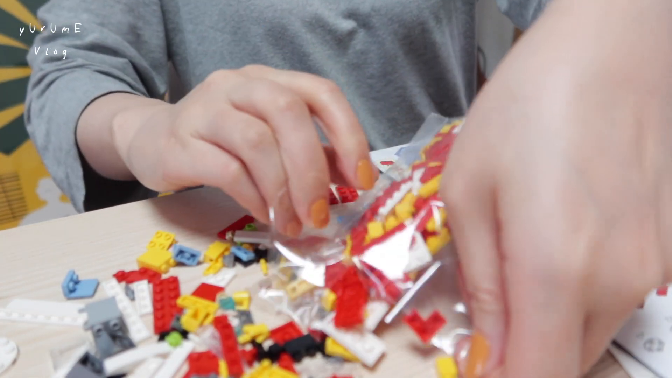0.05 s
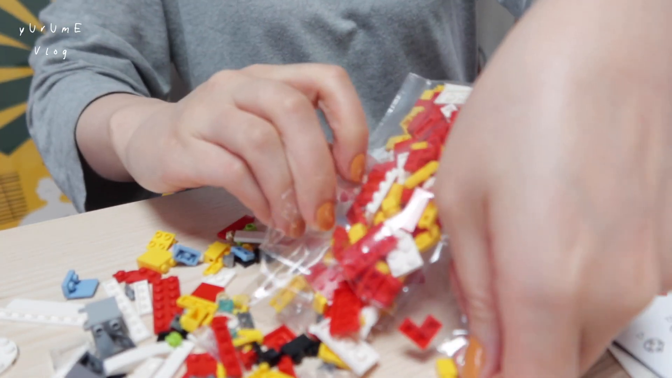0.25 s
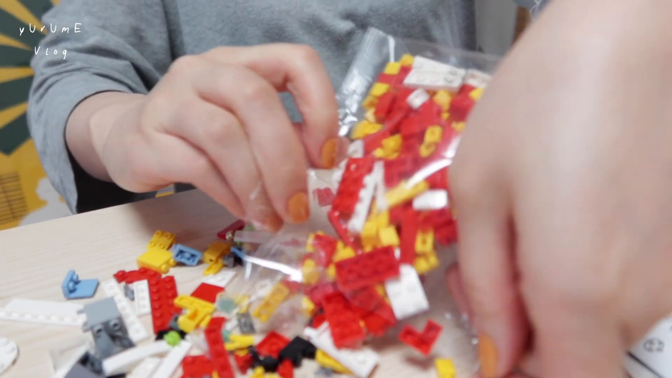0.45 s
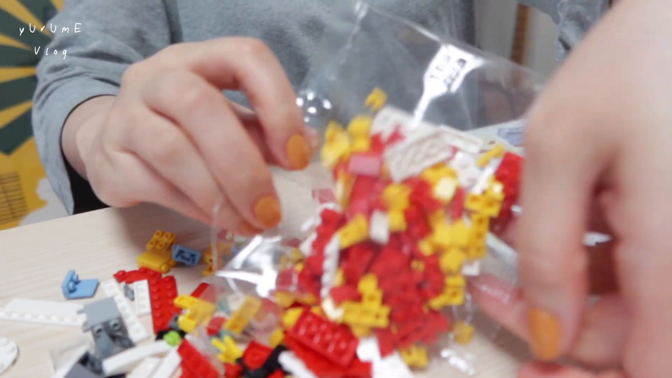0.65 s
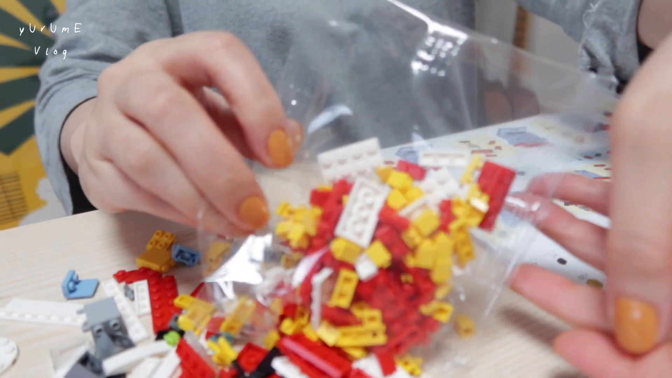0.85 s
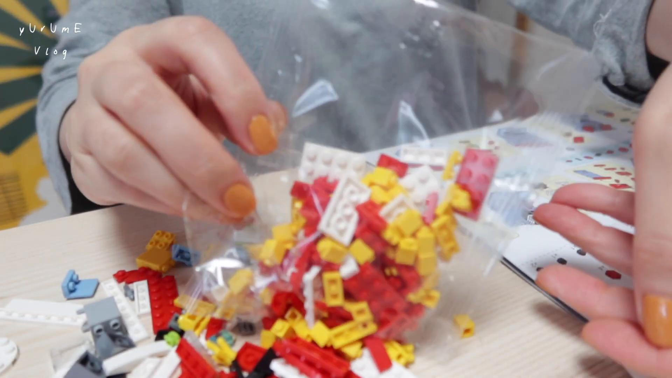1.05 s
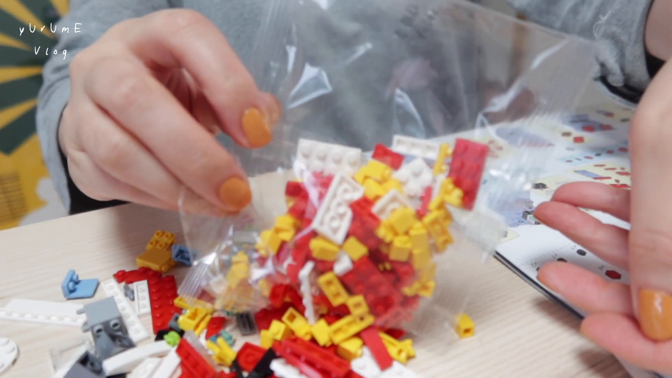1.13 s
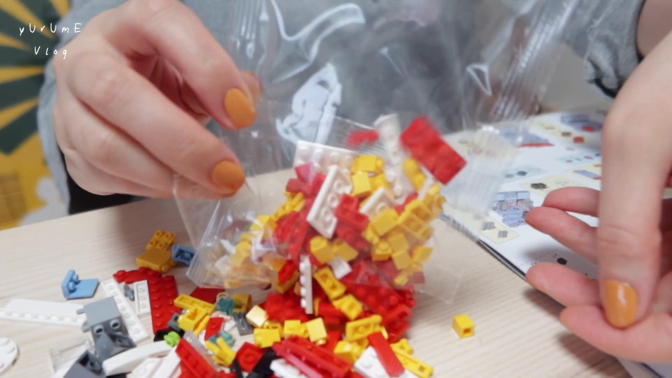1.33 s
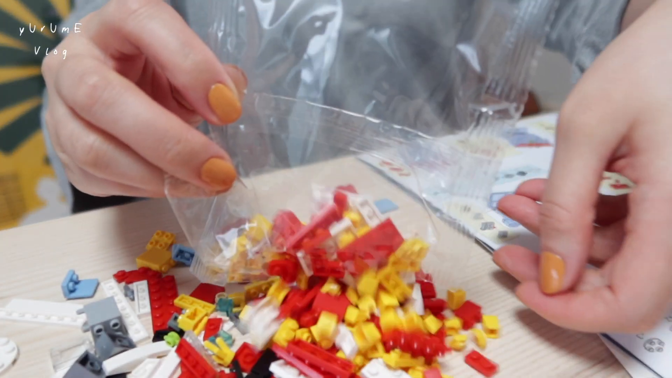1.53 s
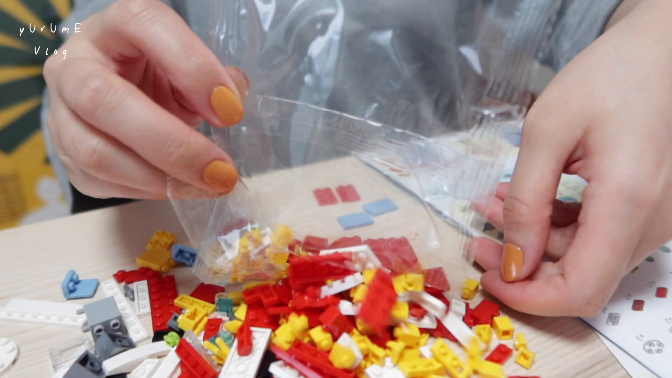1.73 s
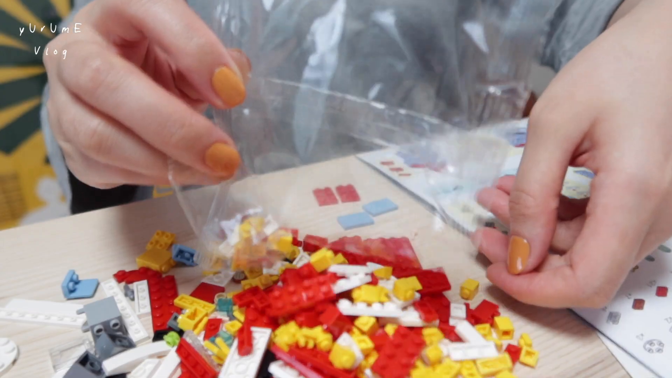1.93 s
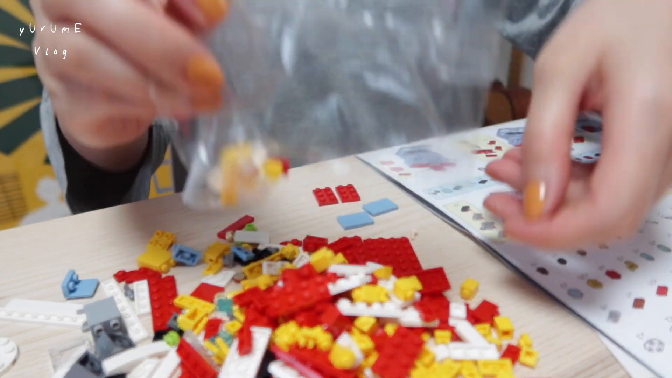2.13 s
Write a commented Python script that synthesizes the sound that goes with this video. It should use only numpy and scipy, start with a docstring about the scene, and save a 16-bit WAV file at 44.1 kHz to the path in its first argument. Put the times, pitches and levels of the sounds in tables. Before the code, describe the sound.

Toy bricks clatter close to the microphone in a quiet room. Their plastic bag crackles as they slide inside it, and after a brief lull they spill onto a wooden table, ending in a few faint clicks.

```python
"""Toy bricks pour out of a thin plastic bag onto a wooden table, close by in a small room.
The bricks click against each other with short, bright rings and patter dully on the table
until the heap settles. As the bag is lifted and emptied, its stiff plastic crinkles, its folds
snap through, and the bricks hiss softly as they slide over it. A quiet room tone lies underneath."""
import sys
import numpy as np
from scipy import signal
from scipy.fft import rfft, irfft, next_fast_len
from scipy.io import wavfile
from scipy.ndimage import map_coordinates

SR = 44100
rng = np.random.default_rng(int(sys.argv[2]) if len(sys.argv) > 2 else 0)


def store_pcm(level_fs):
    """Save levels as 16-bit WAV."""
    pcm = np.round(np.clip(level_fs, -1, 1) * 32767).astype(np.int16)
    wavfile.write(sys.argv[1], SR, np.atleast_2d(pcm).T)


N = 97020  # 2.2 seconds


def amp(db):
    """Turn decibels into a number to multiply by."""
    return 10 ** (np.asarray(db) / 20)


def unit(x):
    """Scale a sound to an average power of 1."""
    return x / np.sqrt(np.mean(x ** 2) + 1e-20)


def value_at(points, hz):
    """Read between (pitch_hz, value) points on a log pitch scale."""
    pitches, values = np.transpose(points)
    return np.interp(np.log(hz + 1), np.log(pitches + 1), values)


def shape_tone(x, points):
    """Make some pitches louder and others softer, following (pitch_hz, level_db) points."""
    size = next_fast_len(N + SR // 4)
    gains = amp(value_at(points, np.fft.rfftfreq(size, 1 / SR)))
    cepstrum = irfft(np.log(gains), size)
    cepstrum[1:size // 2] *= 2  # folded so the filter rings after a click, never before
    cepstrum[size // 2:] = 0
    return irfft(rfft(x, size) * np.exp(rfft(cepstrum)), size)[:N]


def cut_bass(x, hz):
    """Turn down everything below the given pitch."""
    return signal.sosfilt(signal.butter(2, hz, "high", fs=SR, output="sos"), x)


def seconds(samples):
    """The time of each sample."""
    return np.arange(samples) / SR


def fade(t, fade_s):
    """Die away by 60 dB every fade_s seconds."""
    return np.exp(-np.log(1000) * t / fade_s)


def place(times, sounds):
    """Add each row of sound to the track at its start time."""
    at = np.round(np.abs(times) * SR).astype(int).reshape(-1, 1) + np.arange(sounds.shape[1])
    return np.bincount(at.ravel(), sounds.ravel(), N)[:N]


def wobble(per_s):
    """A smooth curve through per_s random values a second."""
    return map_coordinates(rng.standard_normal(1000), [np.arange(N) * per_s / SR], mode="mirror")


def random_touches(level_db, peak_per_s, scatter_db, count=9000):
    """Times and sizes of small touches: more in a strong flow, but smaller, so the power stays even."""
    per_s = peak_per_s * amp(0.4 * (level_db - level_db.max()))
    so_far = np.cumsum(per_s) / SR
    jitter, size, sign = rng.standard_normal((3, count))
    turn = np.arange(count) + jitter
    times = np.interp(turn, so_far, seconds(N))
    sizes = np.sign(sign) * amp(scatter_db * np.clip(size, -2, 2))
    sizes /= np.sqrt(np.interp(turn, so_far, per_s))
    used = min(int(so_far[-1]), count)
    return times[:used], (sizes * (turn > 0))[:used, None]


def tap_shower(level_db, peak_per_s, middle_hz, fade_cycles, spread, scatter_db, samples, count=9000):
    """Many short rings of scattered pitch, each with a quick echo off the table and the heap."""
    times, sizes = random_touches(level_db, peak_per_s, scatter_db)
    detune = 2 * np.tanh(rng.standard_normal((count, 1)) / 2)[:len(times)]
    hz = middle_hz * np.exp(spread * detune)
    echo_s = 0.005 * rng.random(count)[:len(times)]
    t = seconds(samples)
    rise = 1 - np.exp(-t * hz / 0.69)  # swells in about one cycle
    rings = sizes * np.sqrt(hz) * np.sin(2 * np.pi * hz * t) * rise * fade(t, fade_cycles / hz)
    return place(times, rings) + amp(-5.5) * place(times + echo_s, rings)


# The tone of the quiet background: pitch_hz, level_db
BACKGROUND_TONE = [(25, -3), (70, -3), (130, -3), (250, -10.5), (550, -5), (750, -10), (1000, -1),
                   (1230, 4.5), (1500, -25), (4000, -17), (15000, -20.5)]
def room_tone():
    """A faint, steady noise fills the room."""
    return amp(-53) * unit(shape_tone(rng.standard_normal(N), BACKGROUND_TONE))


# How long the room rings: pitch_hz, fade_s
ECHO_FADES = [(100, 0.84), (1000, 0.11), (5000, 0.21), (15000, 0.18)]
def room_echo(x):
    """The walls answer after 5 milliseconds; the bass lasts longest."""
    hz, t, noise = signal.stft(rng.standard_normal(SR // 2), SR, nperseg=256)
    tail = signal.istft(noise * fade(t, value_at(ECHO_FADES, hz)[:, None]), SR, nperseg=256)[1]
    tail = np.concatenate([np.zeros(SR // 200), tail / np.linalg.norm(tail)])
    return signal.fftconvolve(x, tail)[:N]


# The tone of the crinkling plastic: pitch_hz, level_db
CRINKLE_TONE = [(100, -8.5), (450, -1.5), (800, -1.5), (1200, 1.5), (1900, 0.5), (3000, 2.5), (5000, -3.5),
                (7500, -0.5), (16000, 3)]
# The tone of bricks sliding on plastic: pitch_hz, level_db
SLIDE_TONE = [(100, -20), (1000, -14), (3000, 3.5), (5500, 11.5), (7500, -1), (10000, 4), (12500, -23),
              (16000, -14)]
def bag_crinkle(level_db):
    """The bag creases and is drummed by the bricks, which hiss softly as they slide over it."""
    taps = tap_shower(level_db, peak_per_s=4000, middle_hz=1908, fade_cycles=10.9,
                      spread=0.785, scatter_db=3.5, samples=500)
    crinkle = unit(shape_tone(taps, CRINKLE_TONE))
    slide = unit(shape_tone(rng.standard_normal(N), SLIDE_TONE))
    return amp(level_db - 2) * (crinkle + amp(-8.5) * slide)


# Each snap of a fold, before its parts' gains: start_s, body_db, body_hz, crack_db, crack_hz, puff_db
FOLD_SNAPS = [(0.0961, -47, 1074, -37, 4350, -38), (0.1265, -22, 1700, -21.5, 2310.0, -33),
              (0.1742, -42, 703.4, -24.5, 2620, -38.5), (0.1973, -34, 1810.0, -19, 4170, -35),
              (0.2068, -32, 1200, -20.5, 3050, -39), (0.223, -15, 1550, -13.5, 3330, -30),
              (0.2497, -32, 1800.0, -24.5, 2200, -55), (0.3113, -19, 1120, -12.5, 2460, -33),
              (0.3171, -27, 1380, -27, 3670, -40), (0.3309, -33, 1340, -10, 3580, -18),
              (0.3835, -24.5, 1480.0, -50, 2140, -35), (0.429, -24.5, 764, -40, 2920, -52),
              (0.5013, -22, 1330, -16, 3130, -26.5), (0.5156, -18, 1230, -15, 3700, -28.5),
              (0.542, -23, 1603, -17, 4700.0, -23.5), (0.5804, -41, 650.0, -19.5, 4600, -31),
              (0.5985, -19.5, 1390.0, -12.5, 3040, -22), (0.6795, -10.5, 1640, -9, 2650, -35),
              (0.6809, -21, 1710, -2, 3390, -29), (0.7145, -18, 1689, -16, 2850, -24.5),
              (0.7974, -13.5, 1330, -38, 2630.0, -47), (0.821, -29, 1162, -21.5, 2850, -38),
              (0.856, -25, 1382, -26, 3410.0, -26), (0.9525, -33.5, 1120.0, -31.5, 5193, -37.5),
              (1.0127, -24, 853, -32.5, 2620, -35.5), (1.037, -27, 1019, -27, 3100, -40),
              (1.045, -23, 1310.0, -36.5, 2800.0, -50), (1.0786, -26.5, 1010, -24.5, 2413, -38),
              (1.3427, -23, 1650.0, -28, 2330, -31), (1.3654, -22, 980.0, -14, 2633, -28),
              (1.9227, -30.5, 1346, -19, 4598, -29)]
# The high rings in one crack: times_crack_pitch, level_db
CRACK_RINGS = [(1, 0), (1.36, -8), (1.7, -9)]
# The tone of a snap's puff of noise: pitch_hz, level_db
PUFF_TONE = [(100, -19), (600, 14.5), (2000, 7.5), (6000, 10), (7500, 4.5), (10000, 7), (16000, -9)]
def bag_snaps():
    """A fold pops through: a low ring, a few high ones, a ringing air pocket and a puff of noise."""
    times, body_db, body_hz, crack_db, crack_hz, puff_db = np.transpose(FOLD_SNAPS)[:, :, None]
    t = seconds(600)
    body = amp(body_db + 8.5) * np.sin(2 * np.pi * body_hz * t) * fade(t, 0.0065)
    high_rings = sum((-1) ** k * amp(db) * np.sin(2 * np.pi * ratio * crack_hz * t)
                     for k, (ratio, db) in enumerate(CRACK_RINGS))
    crack = amp(crack_db + 6.5) * high_rings * fade(t, 0.0052)
    air_pocket = amp(body_db - 2.5) * np.sin(2 * np.pi * 680 * t) * fade(t, 0.0052)
    puff = amp(puff_db + 10.5) * rng.standard_normal(body.shape) * fade(t, 0.0046)
    rise = 1 - np.exp(-t / 0.00023)
    rings = place(times, rise * (air_pocket - body + crack))
    puffs = shape_tone(place(times, rise * puff), PUFF_TONE)
    return cut_bass(rings + puffs, hz=700)  # the snaps carry no bass


# The tone of knocks on the wooden table: pitch_hz, level_db
TABLE_TONE = [(30, 1.5), (80, -6), (200, 0), (500, 12), (900, 9), (2000, 12.5), (8000, -6)]
def table_patter(level_db):
    """Bricks knock dully on the table top."""
    knocks = tap_shower(level_db, peak_per_s=600, middle_hz=369, fade_cycles=4.2,
                        spread=0.81, scatter_db=0.5, samples=2000)
    return amp(level_db - 4.5) * unit(shape_tone(knocks, TABLE_TONE))


# The notes a struck brick rings with: pitch_hz, level_db, fade_s, spread_share_of_pitch
BRICK_NOTES = [(3280, -7.5, 0.018, 0.027), (4795, -2, 0.024, 0.018), (5650, -5.5, 0.0058, 0.17),
               (9200, 3, 0.007, .09), (10483, 0, 0.034, .018), (11340, 0, 0.011, 0.053),
               (13100, -14, .004, 0.27)]
def brick_rings(bricks, low_db=0, high_db=0):
    """One ring per row; every brick's notes differ a little in pitch and strength."""
    t, rings = seconds(900), 0
    for hz, db, fade_s, spread in BRICK_NOTES:
        detune, strength = rng.standard_normal((2, 4000, 1))[:, :bricks]
        gain = amp(db + (low_db if hz < 7000 else high_db) + 2 * strength)
        own_hz = hz * (1 + spread * detune)
        rings = rings + gain * np.sin(2 * np.pi * own_hz * t) * fade(t, fade_s)
    return rings


# The tone of the dry crack of brick on brick: pitch_hz, level_db
BRICK_CRACK_TONE = [(100, -47), (500, -36.5), (1500, -14.5), (3200, 7.5), (5500, 13), (7300, 2.5),
                    (10000, 6.5), (16000, -3)]
def brick_cracks(times, bursts):
    """Each burst of noise becomes the bright, dry crack of two bricks meeting."""
    return shape_tone(place(times, bursts), BRICK_CRACK_TONE)


# Hard brick-on-brick hits, before their parts' gains: start_s, low_notes_db, high_notes_db, crack_db
BRICK_HITS = [(0.5912, -38, -20, -31), (0.6318, -28, -26, -23.5), (0.6432, -26, -14, -16.5),
              (0.764, -29, -34, -42), (0.9256, -43, -33.5, -70), (1.1257, -37.5, -31.5, -27),
              (1.228, -33, -26, -32.5), (1.2565, -28, -27, -30.5), (1.2986, -35.5, -22.5, -32),
              (1.4001, -22, -23.5, -20), (1.423, -22, -13.5, -23), (1.4814, -14, -19.5, -20),
              (1.534, -19, -13.5, -21.5), (1.5693, -11, -31, -22.5), (1.6162, -19, -10.5, -22),
              (1.6241, -17, -24, -15), (1.6507, -26, -32, -30.5), (1.6567, -35, -17, -23),
              (1.699, -20.5, -16.5, -30), (1.711, -24, -29, -29), (1.74, -20, -14, -22),
              (1.7882, -15, -29, -19), (1.808, -23, -27, -31), (1.8421, -20.5, -16, -42),
              (1.9865, -39, -40, -31), (2.0148, -36.5, -48, -43), (2.0292, -44, -58, -37.5),
              (2.06, -44.5, -44, -43), (2.077, -47.5, -53.5, -49.5)]
def hard_hits():
    """Single bricks land harder than the rest; where they are struck decides which notes ring."""
    times, low_db, high_db, crack_db = np.transpose(BRICK_HITS)[:, :, None]
    rings = brick_rings(len(times), low_db, high_db)
    t = seconds(rings.shape[1])
    bursts = amp(crack_db + 1.5) * rng.standard_normal(rings.shape) * fade(t, 0.0068)
    return amp(-3.5) * place(times, rings) + brick_cracks(times, bursts)


def tumbling_bricks(level_db):
    """Bricks knock together: many dry cracks and fewer bright rings, which the bag muffles at first."""
    pour_start_s, pour_rise_s, muffle_db = 1.15, 0.081, -2.5
    touches = dict(peak_per_s=1700, scatter_db=4, count=4000)
    times, sizes = random_touches(1.7 * level_db, **touches)  # rings thin out faster in the lulls
    in_bag = 1 - np.clip((seconds(N) - pour_start_s) / pour_rise_s, 0, 1)
    rings = amp(muffle_db * in_bag) * unit(place(times, sizes * brick_rings(len(times))))
    times, sizes = random_touches(level_db, **touches)
    t = seconds(250)
    rise = 1 - np.exp(-t / 0.00024)
    bursts = rng.standard_normal((4000, len(t)))[:len(times)] * rise * fade(t, 0.0054)
    cracks = unit(brick_cracks(times, sizes * bursts))
    return amp(level_db + 0.5) * unit(rings + amp(-1.5) * cracks)


# How the flow swells and dies down, before each layer's gain: time_s, patter_db, crinkle_db, click_db
BRICK_FLOW = [(0.0, -48.0, -37.5, -41.0), (0.039, -43, -33.5, -38.5), (0.09, -52.0, -43.5, -52.5),
              (0.151, -49, -41.0, -53.5), (0.21, -43, -31.5, -41.5), (0.29, -50.5, -41.0, -60.5),
              (0.35, -42, -32.0, -47.5), (0.411, -51.5, -41, -53), (0.459, -40.5, -36.5, -47),
              (0.51, -33.0, -24.0, -31), (0.558, -33.5, -26.0, -31.5), (0.65, -26.0, -18.5, -21.0),
              (0.72, -33.5, -23.5, -29.5), (0.8, -33.0, -23.0, -34), (0.89, -42, -35.0, -45.0),
              (0.949, -47.0, -38.5, -49.0), (1.04, -39, -32.5, -47.0), (1.171, -47.0, -35.5, -49.5),
              (1.25, -37.5, -30.0, -33.5), (1.319, -43.0, -34.0, -37.0), (1.359, -34, -23.5, -31.0),
              (1.39, -39.0, -31, -34.5), (1.43, -37.5, -26, -24.0), (1.59, -31.5, -23.5, -20.0),
              (1.659, -39.5, -30.5, -21.5), (1.78, -38.0, -29.5, -24.5), (1.9, -44, -37.5, -29.0),
              (1.999, -53, -44.5, -45), (2.098, -65, -56, -62), (2.2, -74.0, -69, -68.5)]
def scene():
    """Table, bag and bricks sound together in the room, over its quiet background."""
    times, *levels = np.transpose(BRICK_FLOW)
    rush_db = 1.34 * wobble(per_s=70)  # the bricks move in little rushes
    patter_db, crinkle_db, click_db = [np.interp(seconds(N), times, db) + rush_db for db in levels]
    clatter = table_patter(patter_db) + bag_crinkle(crinkle_db) + tumbling_bricks(click_db) + hard_hits()
    snaps = bag_snaps()
    echo = room_echo(amp(-14) * clatter + amp(-17.5) * snaps)  # the snaps are nearest, so echo least
    sound = cut_bass(clatter + snaps + echo, hz=80)
    return (sound + room_tone())[None]


def record(dry):
    """Clip any peaks past full scale and remove the very highest treble."""
    top_hz = 15800
    size = next_fast_len(N + SR // 4)
    spectrum = rfft(np.clip(dry, -1, 1), size)
    return irfft(spectrum * (np.fft.rfftfreq(size, 1 / SR) < top_hz), size)[..., :N]


dry = scene()
out = record(dry)
store_pcm(out)
```